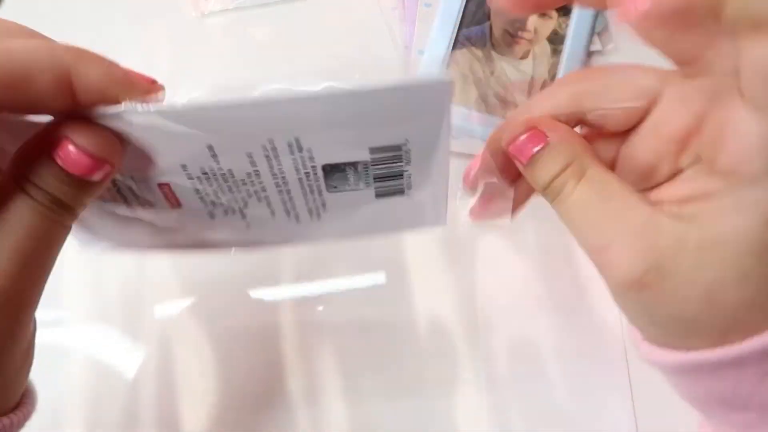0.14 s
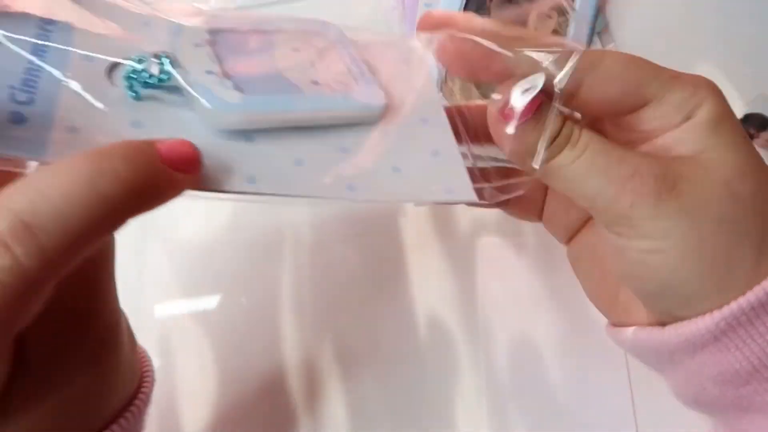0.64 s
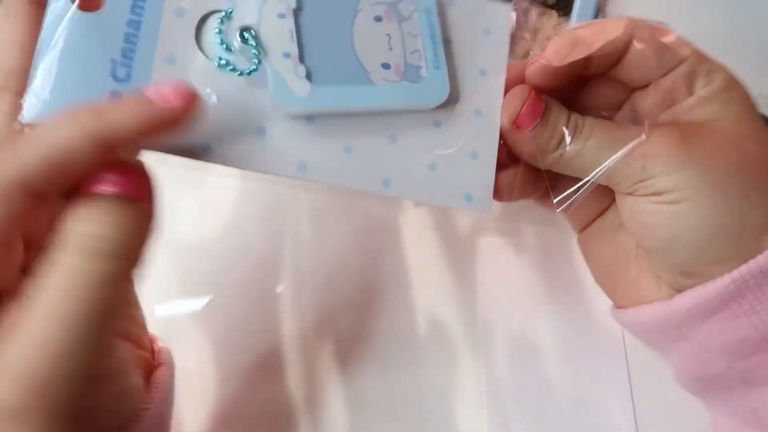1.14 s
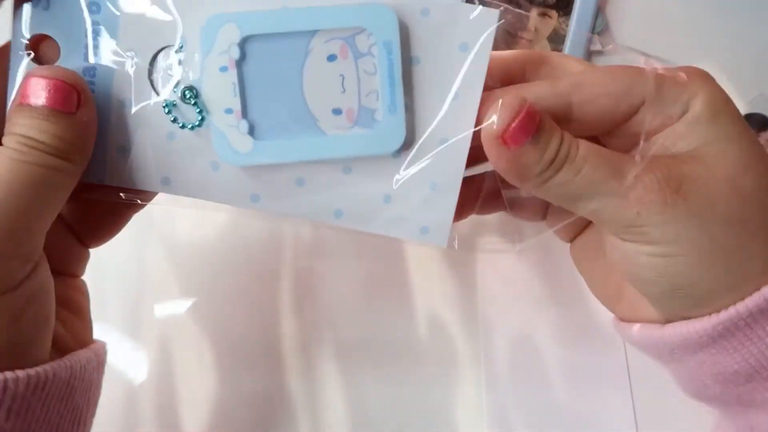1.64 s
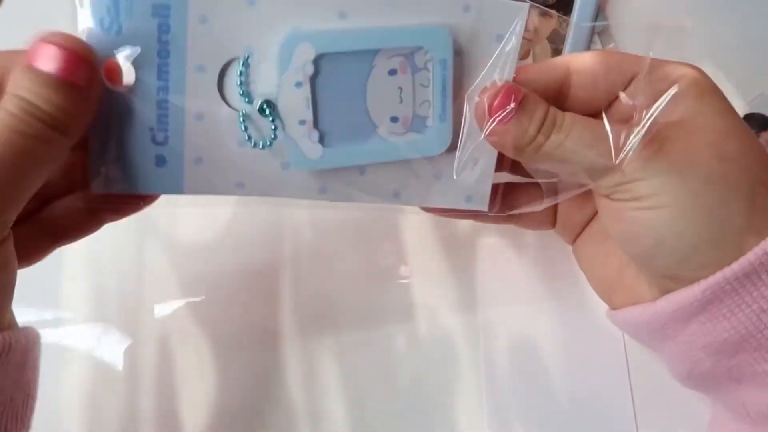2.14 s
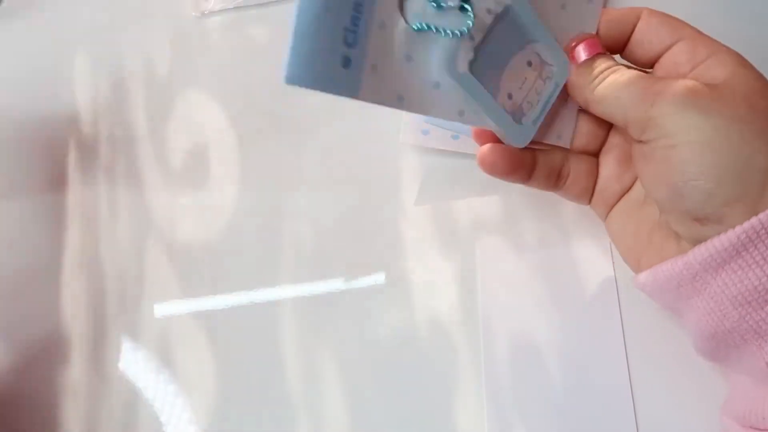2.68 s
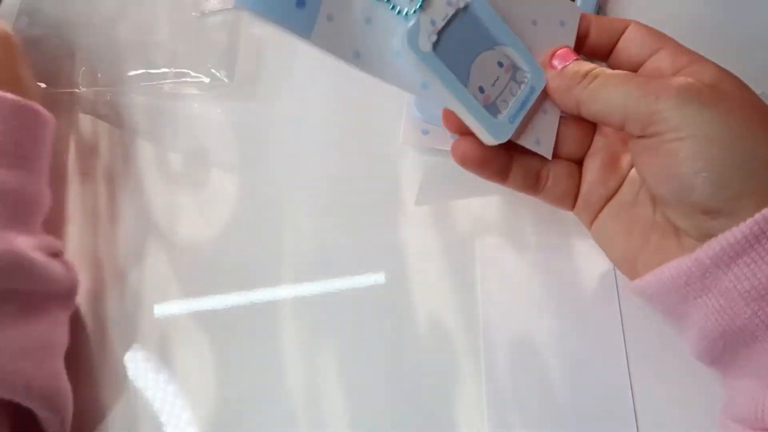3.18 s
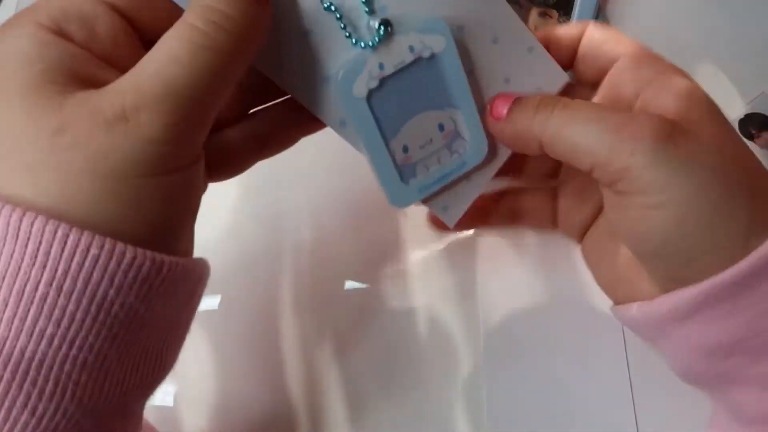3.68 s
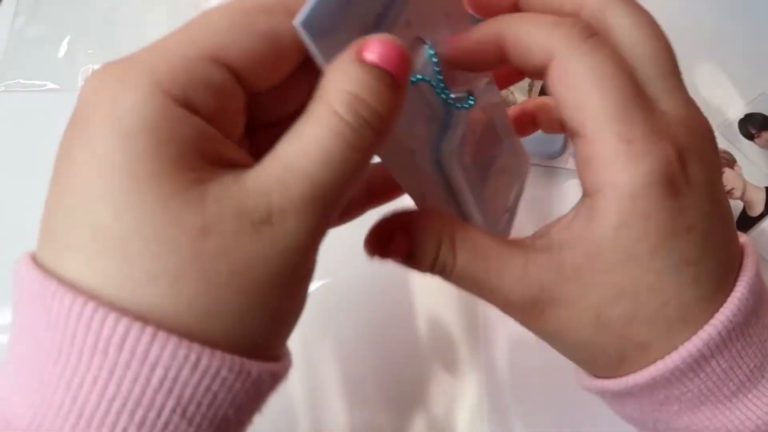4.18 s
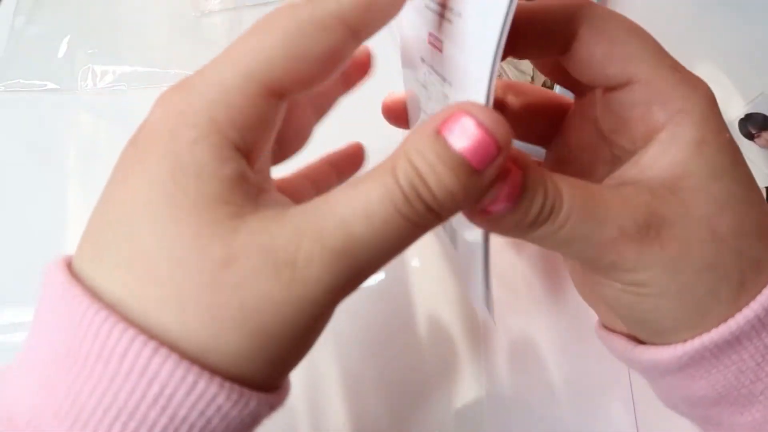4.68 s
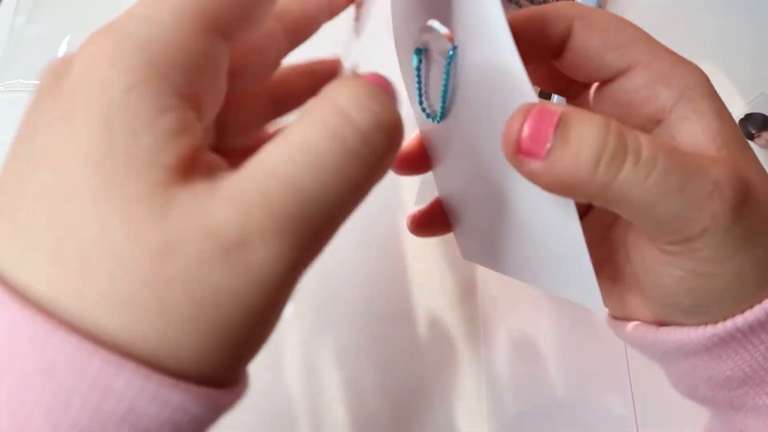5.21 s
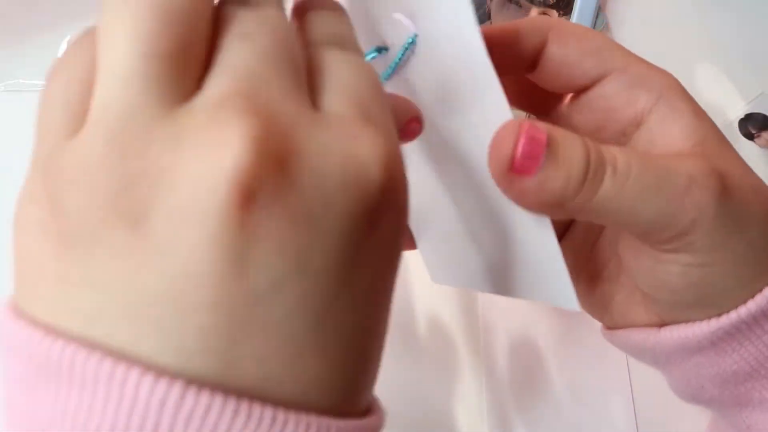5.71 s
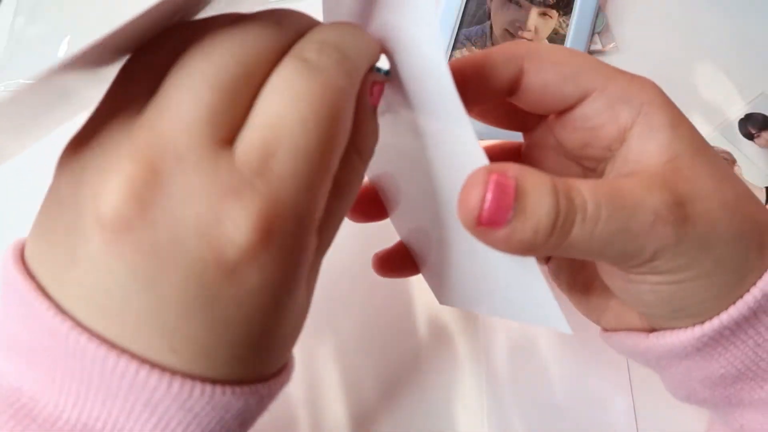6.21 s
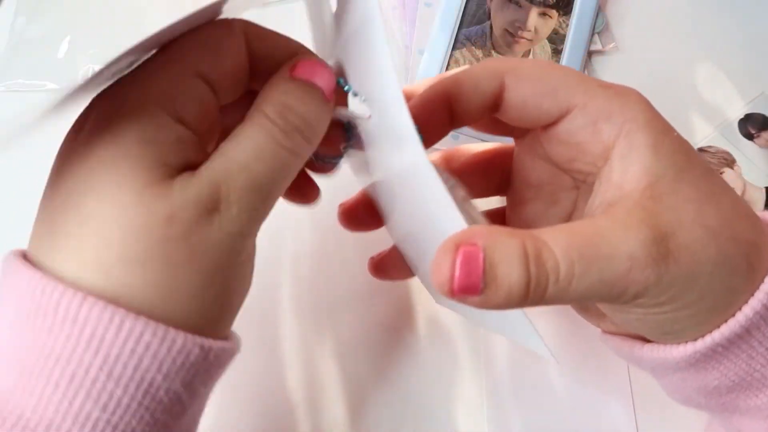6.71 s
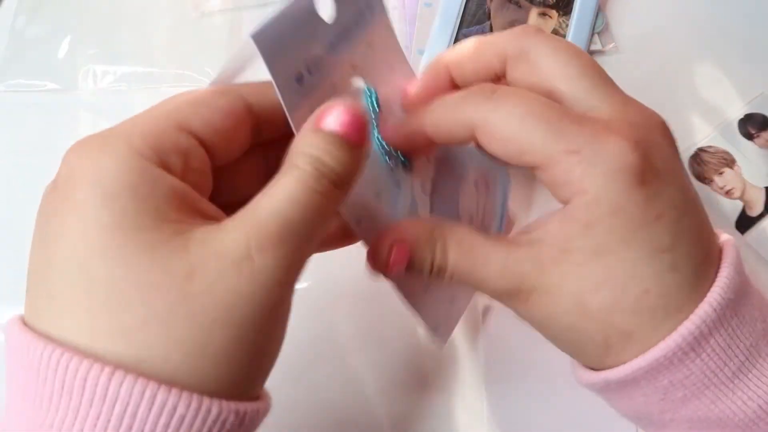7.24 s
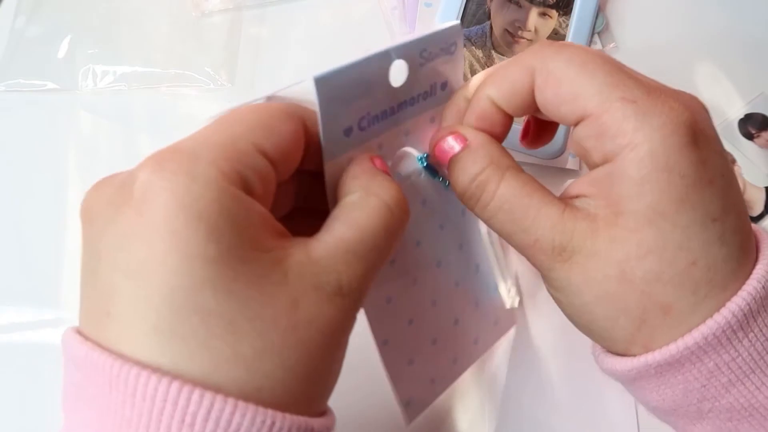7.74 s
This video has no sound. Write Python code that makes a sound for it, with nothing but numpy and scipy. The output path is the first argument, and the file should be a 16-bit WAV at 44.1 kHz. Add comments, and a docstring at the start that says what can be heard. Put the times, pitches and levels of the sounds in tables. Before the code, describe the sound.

Hands slide a card from a thin plastic bag very close to a stereo microphone. Bright, dense snaps and crinkles burst for about two and a half seconds, with fine rustling. They thin to faint ticks and light dull taps on card, then a short group of crackles returns near the end. Quiet room, low rumble and soft hiss underneath.

```python
"""Throughout, a low rumble shared by both ports, the microphones' own hiss and a thin steady tone lie below.
At once two hands slide a card from a thin plastic bag close to two microphone ports: creases snap as
bursts exciting resonators, the card's modes knock in answer, and a rustle of tiny grains follows the hands.
After about two and a half seconds the snaps thin out and the fingers tap the card and its bead chain,
heard as dull modal knocks; a last group of snaps comes after seven seconds."""
import sys
import numpy as np
from scipy import signal
from scipy.fft import rfft, irfft
from scipy.io import wavfile

SR = 44100
rng = np.random.default_rng(int(sys.argv[2]) if len(sys.argv) > 2 else 0)


def digitize_waveform(pressure):
    """Quantize a signal to 16-bit integers and store it at the path in sys.argv[1].

    Rows of a 2-D input are taken as channels; values are limited to [-1, 1].
    """
    field = np.atleast_2d(pressure).T
    bounded = np.clip(field, -1, 1)
    quanta = np.round(bounded * 32767).astype(np.int16)
    wavfile.write(sys.argv[1], SR, quanta)


N = 346626  # samples in the scene


def from_db(db):
    """Level law: 20 dB is a factor of ten in amplitude."""
    return 10 ** (np.asarray(db) / 20)


def at_hz(points, hz):
    """Spectral envelope: values joined by straight lines over log frequency."""
    point_hz, value = np.array(points).T[:2]
    return np.interp(np.log(hz), np.log(point_hz), value)


def drift(rate_hz):
    """Slow random modulation: normal draws at rate_hz joined by straight lines."""
    points = rng.standard_normal(N // 100)
    return np.interp(np.arange(N) * rate_hz / SR, np.arange(len(points)), points)


def ring(clicks, hz, t60_s):
    """Damped resonance: a unit click sets off a decaying sine that starts at height 1."""
    radius = from_db(-60 / (t60_s * SR))
    angle = 2 * np.pi * hz / SR
    feedback = [1, -2 * radius * np.cos(angle), radius * radius]
    return signal.lfilter([0, np.sin(angle)], feedback, clicks + 1e-18)


def grains(pitches, gains, per_s, cycles, uneven_db, clump_db):
    """Granular friction: random clicks in clumps excite short resonances that come and go.

    Returns centre and cross parts, scaled together so that the centre has rms 1."""
    unevenness = uneven_db * np.minimum(rng.exponential(1, N), 4)
    sizes = from_db(unevenness + clump_db * drift(70)) * rng.choice([-1, 1], N)
    born = rng.random(N) < per_s / SR
    clicks = sizes * born * np.array([np.ones(N), rng.standard_normal(N)])
    dealt = rng.integers(0, len(pitches), N)  # each click goes to one resonance
    out = np.zeros((2, N))
    for k, (hz, gain) in enumerate(zip(pitches, gains)):
        share = clicks * (dealt == k) * from_db(5.2 * drift(25))
        out += gain * ring(share, hz, cycles / hz)
    return out / np.sqrt(np.mean(out[0] ** 2))


# spectrum of the background noise, before its overall level is set: pitch_hz, level_db (per Hz)
BACKGROUND_SPECTRUM = [(20, -29.5), (50, -7.5), (80, -5), (190, -12.5), (280, -8.5), (460, -16), (700, -19),
                       (4000, -32.5), (9000, -44), (13100, -38.5)]
# likeness of the two ports in the background noise: pitch_hz, likeness (1 = identical, 0 = unrelated)
PORT_LIKENESS = [(60, 1), (130, 0.75), (290, .0)]


def background_noise():
    """Partial coherence: a bass rumble shared by both ports, above it the microphones' own unrelated hiss."""
    noise_db, whine_db, whine_hz = -52.5, -77, 13050  # rms levels: noise of the mid part, electrical tone
    padded = N + 6
    hz = np.maximum(np.fft.rfftfreq(padded, 1 / SR), 1)
    alike = np.clip(at_hz(PORT_LIKENESS, hz), -1, 1)
    shape = from_db(at_hz(BACKGROUND_SPECTRUM, hz)) * (hz < BACKGROUND_SPECTRUM[-1][0])
    mid, side = rfft(rng.standard_normal((2, padded))) * shape
    mid, side = irfft([mid * np.sqrt(1 + alike), side * np.sqrt(1 - alike)])[:, :N]
    scale = from_db(noise_db) / np.std(mid)
    whine = from_db(whine_db) * np.sqrt(2) * np.sin(2 * np.pi * whine_hz * np.arange(N) / SR)
    return scale * np.array([mid + side, mid - side]) + whine


def room(x):
    """Reverberation: six feedback delays a side, each round weaker and duller as at a wall."""
    t60_s, wall_cut_hz = 0.55, 5500
    out = np.zeros((2, N))
    dull = np.exp(-2 * np.pi * wall_cut_hz / SR)
    lags = (rng.uniform(0.008, 0.03, 12) * SR).astype(int)
    for k, lag in enumerate(lags):
        loop, state = x.copy(), [0.0]
        gain = from_db(-60 * lag / SR / t60_s)
        for i in range(lag, N, lag):  # one delay length at a time
            back, state = signal.lfilter([gain * (1 - dull)], [1, -dull], loop[i - lag:i], zi=state)
            loop[i:i + lag] += back[:N - i]
        out[k % 2] += (loop - x) * (-1) ** (k // 2)
    return out


# slow creep of the film between gestures: start_s, level_db (rustle)
CREEP = [(0, -48), (1.85, -47), (2.0, -60), (2.24, -36), (2.7, -56), (3.3, -67), (3.66, -58), (4.0, -56),
         (4.3, -68), (4.64, -69), (4.78, -60.5), (5.3, -58), (5.5, -64), (6.05, -60), (6.36, -64),
         (6.55, -57), (6.88, -75), (7.0, -60), (7.19, -68), (7.65, -54.5), (7.86, -65)]
# squeezes and rubs of the fingers, each a short swell of rustle: peak_s, level_db (rustle at the top),
# fade_s (time to fade by 10 dB; below zero it swells slowly and stops short)
FINGER_RUBS = [(0.016, -27, 0.03), (0.715, -34, -0.05), (1.078, -30, 0.06), (1.176, -32, 0.02),
               (1.499, -19, -0.0074), (1.681, -36, 0.06), (1.876, -33, 0.03), (2.133, -39, 0.02),
               (2.358, -27, 0.1), (2.529, -33, 0.07), (3.121, -47, 0.07), (3.453, -52, 0.12),
               (3.533, -29.5, 0.02), (3.984, -41, 0.04), (4.086, -37, -0.03), (4.685, -52, 0.08),
               (4.935, -51, 0.06), (5.058, -53, 0.04), (5.257, -44, -0.0248), (5.346, -45, 0.02),
               (5.552, -45, 0.03), (5.61, -48, 0.05), (5.823, -35, 0.04), (6.465, -48, 0.04),
               (6.535, -47, 0.04), (6.734, -42, -0.07), (7.01, -53, 0.1), (7.238, -43, 0.03),
               (7.45, -36, 0.01)]


def handling():
    """Power summation: creep, a swell for each rub and a settling after each snap give the rustle in dB."""
    rise_share = 0.25  # of the fade time of a rub
    settle_db, settle_s = -28, 0.034  # relative to the snap's peak; time to fade by 10 dB
    t = np.arange(0, N + 64, 64) / SR
    swells = [(s, db, fade_s, rise_share * fade_s) for s, db, fade_s in FINGER_RUBS]
    swells += [(s, db + settle_db, settle_s, settle_s / 10) for s, db, *_ in CREASE_SNAPS]
    power = from_db(2 * np.interp(t, *np.transpose(CREEP)))
    for s, db, fade_s, rise_s in swells:
        fall = np.maximum((t - s) / fade_s, (s - t) / rise_s)
        power = power + from_db(2 * (db - 10 * fall))
    return np.interp(np.arange(N) / SR, t, 10 * np.log10(power))


# how much of the handling bends the card: start_s, level_db (relative to the handling level)
CARD_BENDING = [(0, -19), (2.1, -22), (2.6, -6), (3.5, -26), (5.82, -14), (6.55, -5), (7.86, -16)]


def flexing(hands_db):
    """Bending friction: the card bends and rubs in soft low grains, a little different at each port."""
    level_db = hands_db + np.interp(np.arange(N) / SR, *np.transpose(CARD_BENDING))
    pitches = np.geomspace(150, 800, 6)
    soft = grains(pitches, np.sqrt(pitches), per_s=900, cycles=5.5, uneven_db=7.5, clump_db=1.5)
    mid, side = from_db(level_db) * soft
    return np.array([mid + 0.09 * side, mid - 0.029 * side])


# colour of the rustle: pitch_hz, level_db (per Hz, relative)
FILM_COLOUR = [(600, -7.5), (1200, -5), (2200, -3), (3600, -0.5), (5500, -3), (8000, -11), (12500, -19)]


def rustle(level_db):
    """Stick-slip friction: film creeps over card and skin in a fine hiss and a sparser crackle of ticks."""
    pitches = np.geomspace(600, 12500, 18)
    gains = from_db(at_hz(FILM_COLOUR, pitches)) * pitches  # wider resonances need more gain per Hz
    hiss = grains(pitches, gains, per_s=8000, cycles=15.0, uneven_db=2.0, clump_db=3.0)
    crackle = grains(pitches[2::2], gains[2::2], per_s=500, cycles=7.0, uneven_db=3.5, clump_db=3.0)
    return from_db(level_db) * (hiss + from_db(-3.0) * crackle)


# broad resonances of the card, before the grip alters them: pitch_hz, level_db (relative)
CARD_MODES = [(370, -6), (540, -3), (790, 1), (1030, 0), (1600, -2), (2300, -3)]


def card(scrape, chance, centre_hz=None):
    """Modal response: the grip detunes and weights each mode; a tap favours those near its centre."""
    t60_s = 0.02
    draws = chance[:2 * len(CARD_MODES)].reshape(-1, 2)
    out = 0
    for (hz, db), (detune, weight) in zip(CARD_MODES, draws):
        off_db = 0 if centre_hz is None else -5 * np.log2(hz / centre_hz) ** 2
        mode_hz = hz * (1 + np.tanh(detune) / 8)
        out = out + from_db(db + 3 * weight + off_db) * ring(scrape, mode_hz, t60_s)
    return out


# dull taps of a finger or the chain on the card: start_s, level_db (peak before the port filter),
# centre_hz (of the modes that answer)
CARD_TAPS = [(3.632, -32, 950), (5.374, -21, 900), (5.536, -30, 400), (5.653, -29, 493),
             (5.667, -27.5, 360), (5.722, -29, 373), (7.112, -27.5, 850), (7.122, -27, 870)]


def taps(scrape_db, scrape_s):
    """Impact excitation: a soft contact and a short drag set the card's modes going."""
    t = np.arange(4096) / SR
    out = np.zeros(N + len(t))
    for s, peak_db, centre_hz in CARD_TAPS:
        noise = rng.standard_normal(len(t))
        touch = from_db(scrape_db) * noise * np.exp(-t / scrape_s)
        touch[0] = 1
        knock = card(touch, noise[1:], centre_hz)
        at = round(s * SR)
        out[at:at + len(t)] += from_db(peak_db) * knock / np.abs(knock).max()
    return out[:N]


# snaps of the film: start_s, level_db (peak before the port filter), pitch_hz (ringing), and
# where the card is jolted too card_db (its excitation relative to the peak, before knock_db is added)
CREASE_SNAPS = [(0.027, -13, 4560, 4), (0.05, -19, 3000), (0.106, -12, 4500), (0.114, -14, 2470),
                (0.119, -14, 1870), (0.16, -10, 1330, -6.5), (0.216, -18.5, 4800, -12), (0.306, -16, 2250),
                (0.37, -20, 1700), (0.375, -13.5, 3220, -6.5), (0.421, -17, 4130, -2),
                (0.513, -17.5, 2970, -1), (0.551, -5, 5200, -5.5), (0.563, -20, 2420),
                (0.591, -8, 2240, -13), (0.72, -17, 3920, -8.5), (0.764, -14, 2400), (0.775, -17, 3200, -8),
                (0.791, -2.5, 6600), (0.82, -6, 4100), (0.92, -20, 2600, 0), (0.944, -23, 2370),
                (0.973, -25, 1100), (0.983, -21, 3400), (0.999, -10, 4250), (1.033, -23, 3960),
                (1.048, -24, 2070), (1.056, -13, 3330, -10.5), (1.075, -14, 3500), (1.088, -9, 3030, -12),
                (1.129, -18, 4130), (1.147, -22, 4260), (1.174, -13, 3700, -7.5), (1.217, -12, 2740),
                (1.222, -13, 4470, -7), (1.246, -15, 3660), (1.263, -14, 4270), (1.287, -13, 3500, -5),
                (1.371, -22, 4870), (1.403, -9, 3520), (1.407, -10, 4900, -4), (1.423, -14, 2200),
                (1.433, -15, 2370), (1.437, -13.5, 2200), (1.462, -3.5, 2270, -4), (1.489, -8, 3480),
                (1.502, -5.5, 4000, -5), (1.526, -4, 4220), (1.585, -9, 3700, -9), (1.597, -13, 3620),
                (1.603, -13.5, 3630, -4.5), (1.67, -21, 1030), (1.678, -18, 2840, 3), (1.728, -23, 5120),
                (1.776, -18, 1340), (1.787, -14.5, 5560), (1.805, -11.5, 3960), (1.843, -12, 2490),
                (1.865, -9, 5640), (1.872, -13, 4060), (2.06, -9, 3620), (2.135, -19, 6200),
                (2.147, -10, 3640), (2.188, -13, 6100, -11), (2.207, -9.5, 5000, -13), (2.213, -7.5, 4630),
                (2.217, -6.5, 2800, -11.5), (2.224, -6, 5100), (2.248, -15, 2540), (2.266, -13, 4670, -4),
                (2.279, -15, 2000), (2.331, -9, 3080), (2.337, -6.5, 2860), (2.382, -9, 4200, -6.5),
                (2.396, -13, 3000, -2), (2.408, -13, 4370, -7.5), (2.424, -13, 3180),
                (2.438, -13, 3330, -4), (2.484, -17, 2180, 0), (2.492, -15, 3340), (2.514, -8.5, 4500, -4),
                (2.56, -14, 2180, -3), (2.654, -20.5, 3400, -7), (2.731, -22, 2240), (2.868, -23, 5630, -7),
                (3.015, -24, 7500, -12), (3.066, -25, 4850, -10), (3.116, -22.5, 1680, -8),
                (3.445, -26, 4670, -4.5), (3.521, -23, 4650), (3.531, -23.5, 4620), (3.548, -20.5, 4370),
                (3.8, -15, 2340, -5), (3.877, -28, 3100, -10), (3.956, -25, 3870), (3.975, -22, 5440, -9),
                (3.997, -23, 1700), (4.003, -19, 3600), (4.078, -28, 3700), (4.091, -20, 3730),
                (4.213, -21, 2760, -9), (4.226, -27, 950), (5.154, -25, 3800, -7), (5.376, -23, 2400),
                (5.538, -29, 4240), (5.555, -30, 4600), (5.656, -25, 3940, 2), (5.665, -14, 4800),
                (5.768, -35, 2500), (5.81, -16.5, 2500), (5.999, -27.5, 4000, -13), (6.129, -33, 2450),
                (6.459, -33, 2030, -2), (6.56, -28.5, 3520, -7), (6.727, -29, 2860, -5), (6.989, -33, 2580),
                (7.036, -35, 2370), (7.218, -16, 1470, -3), (7.232, -12, 4300, -8), (7.268, -25.5, 2200),
                (7.338, -28, 2300), (7.429, -23, 3080, 3), (7.543, -15, 3960), (7.611, -11, 3840, 0.5),
                (7.618, -16.5, 2220, 2.5), (7.657, -14.5, 2920, -4), (7.846, -27.5, 2570, 3)]


def snaps(cycles, crack_db, slips_db, knock_db, width):
    """Snap-through buckling: a crease flips in a brief burst, rings, cracks, slips on and jolts the card."""
    t = np.arange(4096) / SR
    thin = signal.butter(2, 700, "high", fs=SR, output="sos")  # the snaps carry little below 700 Hz
    mid, across = np.zeros((2, N + len(t)))
    for s, peak_db, hz, *card_db in CREASE_SNAPS:
        noise = rng.standard_normal(len(t))  # its first samples also serve as chance draws
        sizes = np.minimum(rng.exponential(1, len(t)), 3)
        slips = from_db(slips_db + 3.6 * sizes) * noise * (rng.random(len(t)) < 0.15)
        flip_s = 0.00031 * from_db(-0.45 * peak_db)  # a weaker crease takes longer to flip
        clicks = 0.56 * noise * np.exp(-t / flip_s) + slips * np.exp(-t / 0.0088)
        scrape = slips * np.exp(-t / 0.018)  # the card scrapes on for longer
        scrape[0] = np.sign(noise[0])

        wave = ring(clicks, hz, cycles / hz)
        for ratio, share, chance in ((1.8, 0.52, noise[2]), (3.0, 0.28, noise[3])):
            upper_hz = min(hz * ratio * (1 + 0.23 * np.tanh(chance)), 13000)
            wave += share * ring(clicks, upper_hz, cycles / upper_hz)
        crack = noise * (np.exp(-t / 0.0022) + 0.8 * np.exp(-t / 0.0003))
        wave = signal.sosfilt(thin, wave + from_db(crack_db) * crack)
        wave = wave / np.abs(wave).max()

        jolt = from_db(knock_db) * from_db(card_db).sum()  # zero where no card_db is given
        knock = jolt * card(scrape, noise[4:])
        at = round(s * SR)
        mid[at:at + len(t)] += from_db(peak_db) * (wave + knock)
        across[at:at + len(t)] += from_db(peak_db) * width * wave * np.tanh(noise[1] * 2)
    return mid[:N], across[:N]


def to_ports(mid, across):
    """Arrival-time difference: off the centre line the ports differ by the slope of the wave."""
    highpass = signal.butter(1, 4500, "high", fs=SR)
    side = signal.filtfilt(*highpass, np.gradient(across))
    return np.array([mid + side, mid - side])


def port_response(near):
    """Band limiting: near sounds lose their bass and the ports dull the top."""
    low_hz, top_hz = 113.4, 13070
    band = signal.butter(4, [low_hz, top_hz], "band", fs=SR, output="sos")
    return signal.sosfilt(band, near)


def scene():
    """Superposition: hands at work in front of the ports, their echo and the background noise."""
    hands_db = handling()
    snap, snap_across = snaps(cycles=14.4, crack_db=-3.5, slips_db=-21, knock_db=-18.0, width=1.0)
    film, film_across = rustle(hands_db)
    mid = snap + film + taps(scrape_db=-21, scrape_s=0.018)
    left, right = from_db(-20.5) * room(mid)
    across = snap_across + 0.95 * film_across + left - right
    near = to_ports(mid + (left + right) / 2, across)
    near += flexing(hands_db)
    return port_response(near) + background_noise()


def roll_off(x):
    """The treble ends steeply here."""
    return signal.sosfilt(signal.butter(12, 16650, fs=SR, output="sos"), x)


def record(dry):
    """Two-channel pickup: the pair of port signals is the finished mix."""
    return roll_off(dry)


dry = scene()
out = record(dry)
digitize_waveform(out)
```